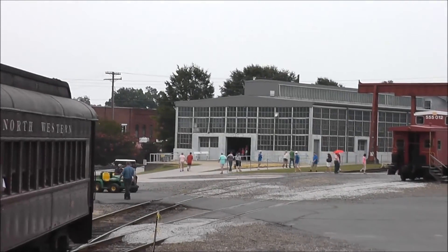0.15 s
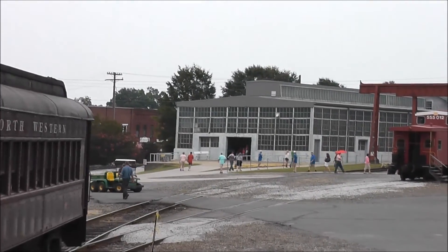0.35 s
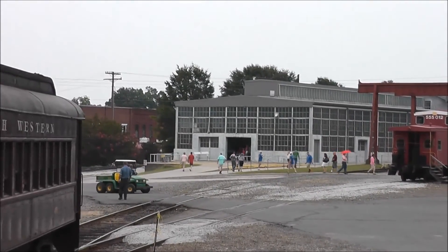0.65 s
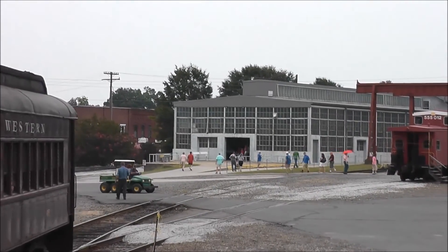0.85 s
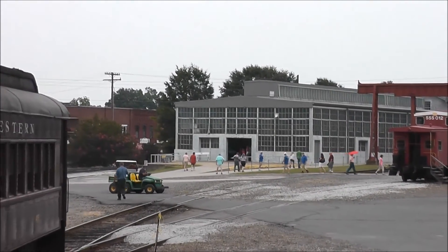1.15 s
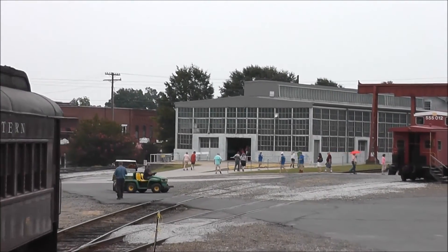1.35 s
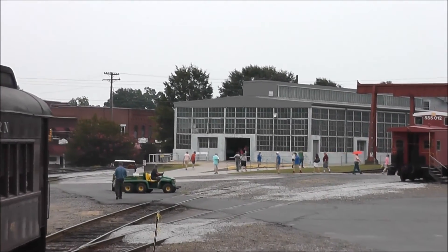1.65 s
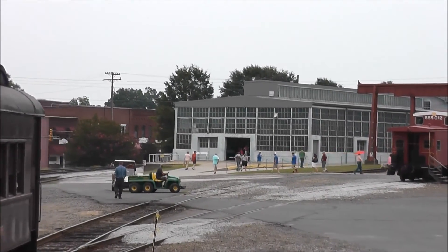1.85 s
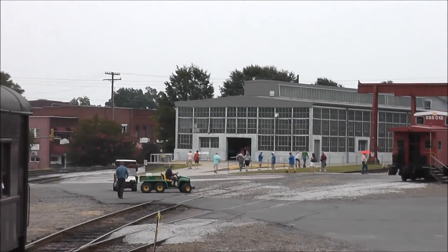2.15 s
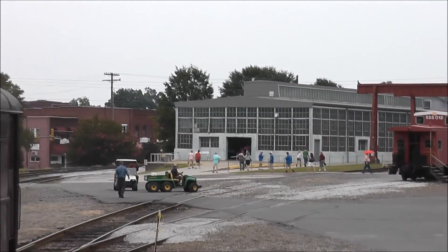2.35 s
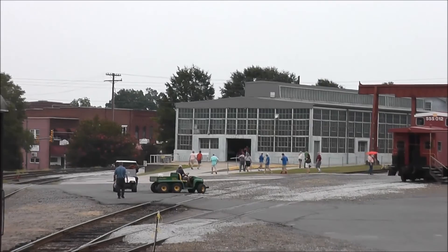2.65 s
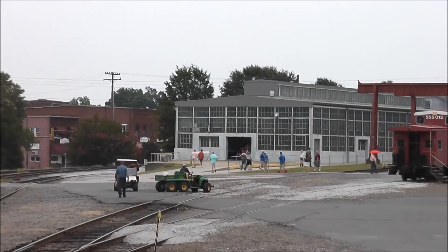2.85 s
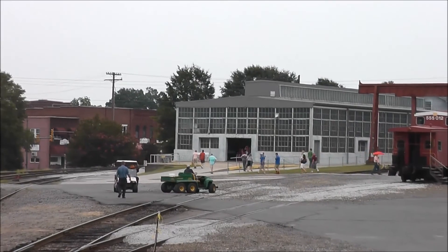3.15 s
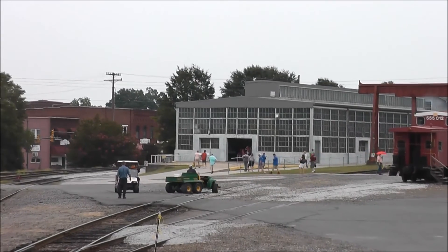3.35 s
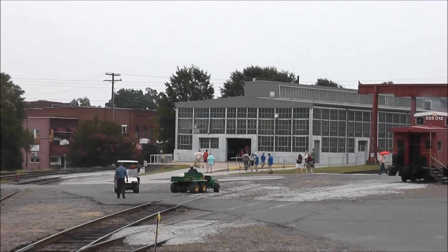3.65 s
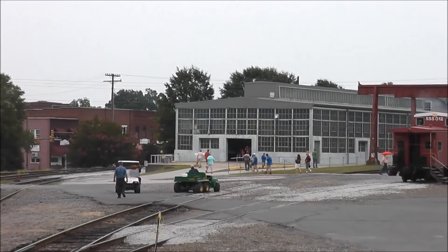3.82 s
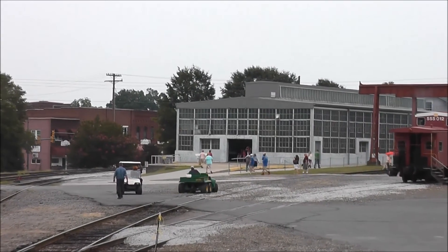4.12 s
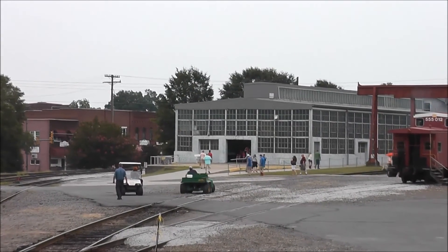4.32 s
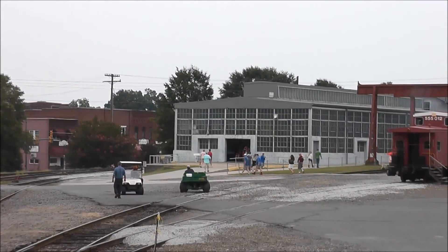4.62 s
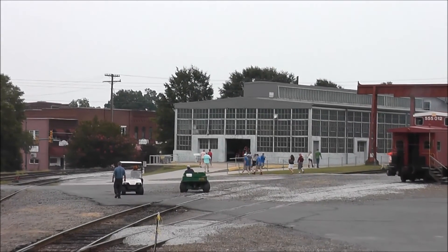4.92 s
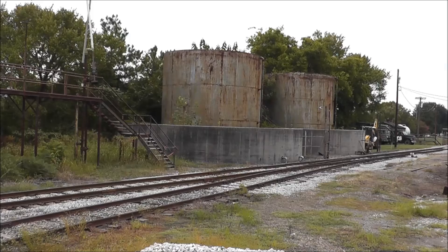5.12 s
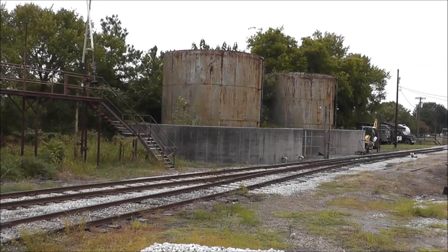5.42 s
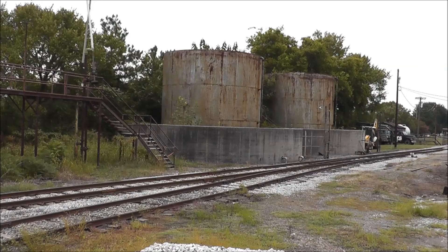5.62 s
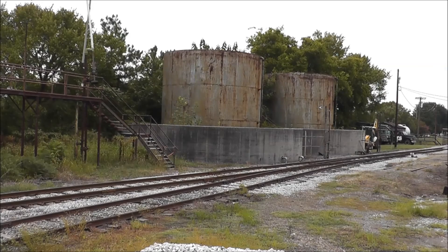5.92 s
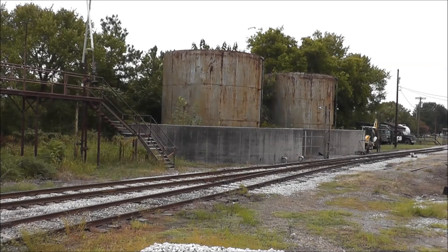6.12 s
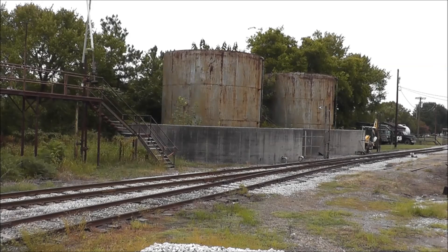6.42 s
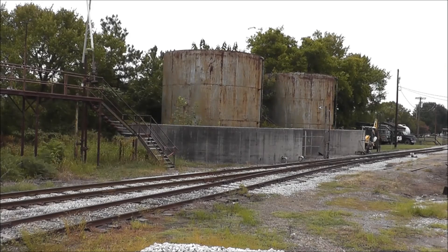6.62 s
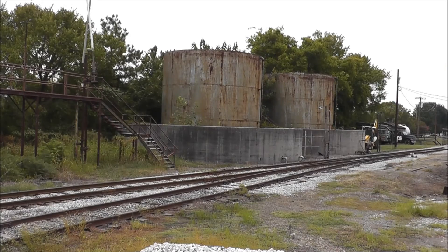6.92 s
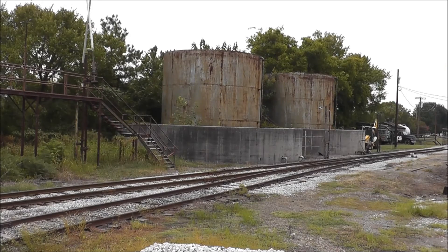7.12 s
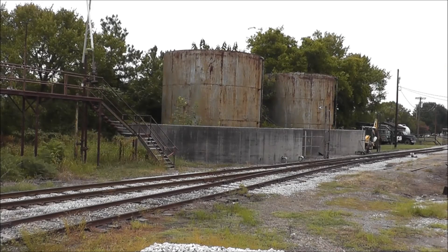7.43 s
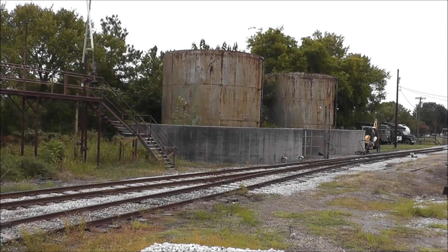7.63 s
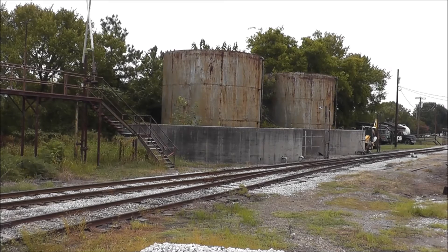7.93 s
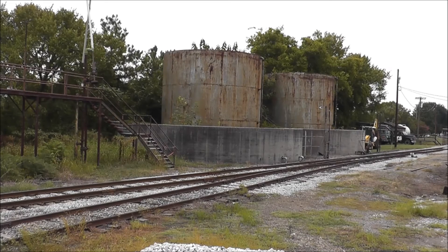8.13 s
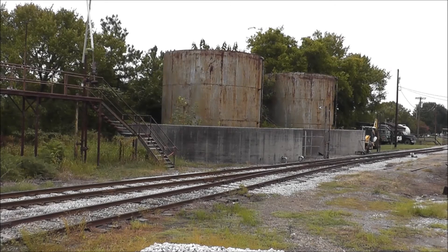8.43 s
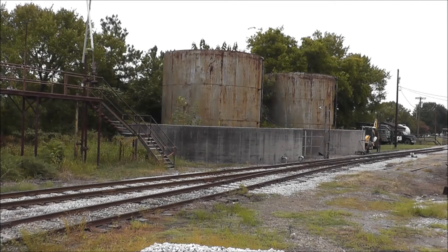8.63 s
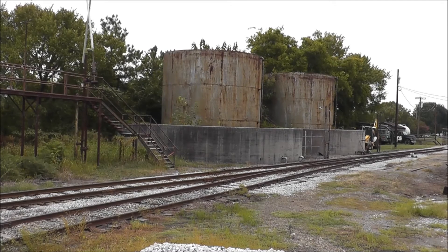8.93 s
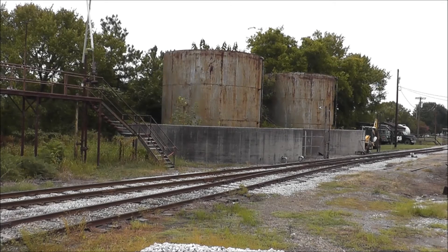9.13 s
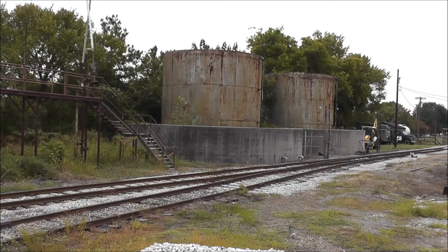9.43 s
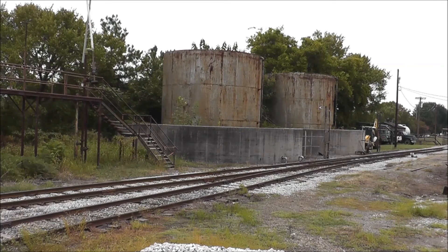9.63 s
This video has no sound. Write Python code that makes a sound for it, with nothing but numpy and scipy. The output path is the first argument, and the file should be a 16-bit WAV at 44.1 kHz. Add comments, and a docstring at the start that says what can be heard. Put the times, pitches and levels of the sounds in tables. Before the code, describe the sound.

A railway coach rolls slowly past, rumbling, clanking and squealing, then after a sudden silence a distant steam locomotive rumbles nearer.

```python
"""In a rail yard, the last coach of a slow steam train passes close by. Its body rumbles and thumps, and
its steel wheels grind on the rails, clank over the joints and squeal on the curve. The sound stops dead.
After a short silence a second scene fades in: the locomotive rumbles nearer from far off, with a low
drone, dull rail clatter, thinly singing wheels and very faint insects."""
import sys
import numpy as np
from scipy import signal
from scipy.fft import rfft, irfft, next_fast_len
from scipy.io import wavfile
from scipy.ndimage import uniform_filter1d

SR = 44100
rng = np.random.default_rng(int(sys.argv[2]) if len(sys.argv) > 2 else 0)


def pcm_store(signal):
    """Save signal as 16-bit PCM."""
    levels = np.round(np.clip(np.atleast_2d(signal), -1, 1) * 32767)
    wavfile.write(sys.argv[1], SR, levels.astype(np.int16).T)


N = 430857
T = np.arange(N) / SR
HZ = np.maximum(np.fft.rfftfreq(N, 1 / SR), 1)
RECEDE_S, CUT_S, RESUME_S = 2.66, 4.587, 5.07  # coach draws away, first scene ends, second begins
LEAD_S = .03  # a clank starts with a scrape, this long before its blow

# The notes a coach wheel rings at as it bends. Each row: pitch in Hz, relative level in dB.
WHEEL_MODES = [(1560, -1), (1980, -2.5), (2650, -5), (3050, 4), (3560, -3), (4050, 1), (4400, 2.5),
               (4820, -3), (5270, -4.5), (5620, 2), (6050, -5), (6450, 4.5), (7100, -15.5), (7600, 4.5),
               (7950, -1.5), (8400, -8.5), (9350, -18.5)]
# How hard the wheels grind on the curve. Each row: time in seconds, relative level in dB.
GRIND_LEVELS = [(0.0, -26.5), (0.16, -29.5), (0.3, -26), (0.5, -31.5), (0.75, -27), (0.82, -32),
                (0.95, -29), (1.17, -28.5), (1.4, -26.5), (1.82, -26.5), (2.01, -26.5), (2.54, -31),
                (2.91, -27), (3.05, -33.5), (3.49, -32.5), (4.11, -35), (4.26, -38), (4.38, -40.5)]
# The tone of steel struck nearby. Each row: frequency in Hz, relative level in dB.
CLANK_COLOUR = [(150, -11.5), (450, 13), (1000, 6), (2200, 3), (4300, 0.5), (5500, -6), (8000, -14.5),
                (10500, -32), (15000, -46)]


def undb(db):
    """Turn decibels into a gain to multiply by."""
    return 10 ** (np.asarray(db) / 20)


def unit(x):
    """Scale to an average power of 1."""
    return x / np.sqrt(np.mean(x ** 2))


def curves(table):
    """Join a table's values with straight lines; its first column is the time."""
    times, *columns = np.transpose(table)
    return [np.interp(T, times, column) for column in columns]


def arch(middle_s, length_s):
    """A rounded rise from 0 to 1 and back."""
    return np.maximum(1 - (2 * (T - middle_s) / length_s) ** 2, 0)


def walk(rate, count=N):
    """Wander smoothly around zero, taking about `rate` random steps a second."""
    step = max(int(SR / rate), 2)
    held = np.repeat(rng.standard_normal(count // step + 2), step)
    return 1.18 * uniform_filter1d(held, step)[:count]


def shape(points, hz=HZ):
    """Gain at each frequency, drawn through (Hz, dB) points."""
    points_hz, db = np.transpose(points)
    return undb(np.interp(np.log(hz), np.log(points_hz), db))


def humps(modes):
    """Gain that lifts or lowers a band around each resonance."""
    return undb(sum(db / (1 + (2 * (HZ - hz) / width_hz) ** 2) for hz, width_hz, db in modes))


def crowded_modes(hz, depth_db, count=500):
    """Heavy steel has too many resonances to list, so use narrow random peaks and dips."""
    return undb(depth_db * np.interp(hz, np.linspace(0, SR / 2, count), rng.standard_normal(count)))


def below(edge_hz, order=8):
    """Gain that keeps the low frequencies."""
    return 1 / np.sqrt(1 + (HZ / edge_hz) ** order)


def above(edge_hz):
    """Gain that keeps the high frequencies."""
    return np.sqrt(1 - below(edge_hz) ** 2)


def filtered(x, gain):
    """Give each frequency its own gain."""
    size = next_fast_len(N, True)
    gain = np.interp(np.fft.rfftfreq(size, 1 / SR), HZ, gain)
    return irfft(rfft(x, size) * gain, size)[..., :N]


def add(track, s, sound):
    """Mix a sound in at s seconds, dropping whatever falls outside the track."""
    start = min(int(s * SR), N - 1)
    part = sound[..., max(-start, 0):N - start]
    start = max(start, 0)
    track[:, start:start + part.shape[-1]] += part


def place(sound, lean, width):
    """Make stereo: direct sound leans to one side, and sound scattered by the yard adds width."""
    direct, scattered = sound
    pan = (shape(lean) - 1) / (shape(lean) + 1)
    diffuse = np.sqrt(np.maximum(shape(width) ** 2 - pan ** 2, .001))
    side = filtered(direct, pan) + filtered(scattered, diffuse)
    return np.array([direct + side, direct - side])


def rough_noise(gain, rate, rough_db):
    """Noise in uneven bursts, as when rough surfaces roll. Two rows: direct and scattered sound."""
    bursts = rng.standard_normal((2, N)) * undb(rough_db * walk(rate))
    return unit(filtered(bursts, gain))


def sing(hz, length_s, jitter, flutter_db=4.5, glide=0, count=22050):
    """Rubbing feeds one note, which swells, flutters and dies within `count` samples."""
    size = int(np.clip(length_s * SR, 200, count))
    bend = 1 + glide * np.linspace(-.5, .5, size) + jitter * walk(350, count)[:size]
    phase = 2 * np.pi * np.cumsum(hz * bend) / SR
    swell = np.sqrt(np.hanning(size)) * undb(flutter_db * walk(80, count)[:size])
    return swell * np.array([np.sin(phase), np.cos(phase)])


def clank(colour, treble_db, length_s, tail_db, tail_t60,
          bite_hz=2000, bite_db=0, scrape_db=-15, chatter_db=1.5, count=16384):
    """A scrape, a chattering blow, then ringing that falls 60 dB in tail_t60 seconds."""
    t = np.arange(count) / SR - LEAD_S
    hz = np.maximum(np.fft.rfftfreq(count, 1 / SR), 1)
    blow = np.exp(-(t / max(length_s, .002)) ** 2) * undb(chatter_db * walk(602, count))
    ring = undb(tail_db - 60 * np.abs(t) / tail_t60 + chatter_db * walk(120, count))
    scrape = undb(scrape_db) * np.exp(-np.abs(t) / .008)
    attack = np.clip(t / max(length_s / 4, .0015), 0, 1)
    force = (attack * (blow + ring) + scrape) * rng.standard_normal((2, count))
    bite = bite_db / (1 + ((hz - bite_hz) / 400) ** 2)  # one resonance stands out
    gain = shape(colour, hz) * undb(treble_db * hz / (hz + 3000) + bite)
    gain *= crowded_modes(hz, depth_db=4.5, count=300)
    return irfft(rfft(force) * unit(gain))


def insects(chirp_hz=6840, chirps_per_s=3.2, swell_s=0.76):
    """An insect throbs over a thin chorus and the faint hiss of open air."""
    throb = np.cos(np.pi * chirps_per_s * (T - 5.7)) ** 2
    chirp = throb * rough_noise(np.exp(-((HZ - chirp_hz) / 90) ** 2), rate=60, rough_db=0)
    chorus = rough_noise(np.exp(-((HZ - 7600) / 500) ** 2), rate=7, rough_db=2.5)
    air = rough_noise(below(12000, order=2), rate=60, rough_db=0)
    fade_in = np.clip((T - RESUME_S) / swell_s, 0, 1)
    return (undb(-75) * chirp + undb(-76) * chorus + undb(-74) * air) * fade_in


def far_scrapes(width_hz=110):
    """Far off, the wheels' guiding rims (flanges) rub the rail with a soft metallic scrape."""
    # Each row: middle in seconds, length in seconds, level in dB.
    scrapes = [(6.78, 0.27, -57), (7.27, 0.2, -52.5), (7.46, 0.36, -53), (8.148, 0.6, -57.5)]
    wheel = sum(undb(db) / (1 + (2 * (HZ - hz) / width_hz) ** 2) for hz, db in WHEEL_MODES)
    swell = sum(undb(db) * arch(s, length_s) for s, length_s, db in scrapes)
    return swell * rough_noise(wheel * above(4700) * below(7000), rate=29, rough_db=3.0)


def far_joints(gain_db=-12.0):
    """The distant engine's wheels strike rail joints with dull clanks."""
    # Each row: time in seconds, relative level in dB, treble boost in dB.
    strikes = [(5.888, -41, -36), (6.185, -39, 4), (6.39, -27, -26), (6.662, -26.5, 5), (6.716, -28.5, 16),
               (7.057, -21, 0), (7.096, -29, 26), (7.107, -19, 8), (7.124, -23, 10), (7.153, -28, 8),
               (7.243, -21.5, 13), (7.267, -22.5, 8), (7.288, -24.5, 9), (7.333, -22.5, 6), (7.368, -26, 3),
               (7.449, -19.5, -12), (7.473, -24, 10), (8.01, -26, 0), (8.326, -25.5, 3), (8.49, -22, -30),
               (8.879, -20.5, -5), (9.3, -25, 1)]
    # The tone of distant steel. Each row: frequency in Hz, relative level in dB.
    colour = [(150, -6), (450, 15), (1400, 18), (2400, 9), (4000, -6.5), (8000, -24), (15000, -76)]
    out = np.zeros((2, N))
    for s, db, treble_db in strikes:
        blow = clank(colour, treble_db, length_s=0.0058, tail_db=-3.0, tail_t60=0.35)
        add(out, s - LEAD_S, undb(db + gain_db) * blow)
    return out


def drone(gain_db=-0.5):
    """Low resonances of the locomotive swell out of its roar."""
    # Each row: middle and length in seconds, pitch in Hz, relative level in dB,
    # then wobble and rise as shares of the pitch.
    notes = [(8.85, 0.8, 256, -34, 0.085, 0), (8.5, 0.2, 440, -29.5, 0.13, 0),
             (8.84, 0.45, 400, -31, 0.0386, 0), (8.95, 0.9, 310, -34.5, 0.15, 0),
             (8.1, 0.38, 790, -41, 0.052, 0.0018), (9.33, 0.48, 435, -36, 0.12, 0.016),
             (9.38, 0.83, 740, -36.5, 0.119, 0.029)]
    out = np.zeros((2, N))
    for s, length_s, hz, db, jitter, glide in notes:
        tone = sing(hz, length_s, jitter, flutter_db=4.0, glide=glide, count=SR)
        add(out, s - length_s / 2, undb(db + gain_db) * tone)
    return out


def locomotive():
    """The engine's rumble, rolling roar and hiss of steam and rails grow as it comes nearer."""
    # Each row: time in seconds, then relative levels of rumble, roar and hiss in dB.
    approach = [(5.3, -52.5, -54.5, -66.5), (5.39, -48, -52, -64), (6.37, -38, -39.5, -51),
                (6.64, -33.5, -38, -48), (6.66, -32.5, -35, -45), (6.91, -30.5, -36, -46.5),
                (7.25, -30.5, -32.5, -40.5), (7.81, -29, -34, -43.5), (8.92, -29.5, -31.5, -42),
                (9.77, -29.5, -32.5, -41.5)]
    # Brief swells of the rumble. Each row: middle in seconds, length in seconds, rise in dB.
    heaves = [(7.56, 0.33, 2), (8.234, 0.28, 2.5), (8.66, 0.2, 2), (9.151, 0.14, 2.5)]
    # The engine's overall tone. Each row: frequency in Hz, relative level in dB.
    colour = [(15, -46), (25, -16), (69, 0.5), (129, 3.5), (221, -7), (253, -2.5), (289, -10.5), (433, -7),
              (631, -12.5), (761, -11), (970, -17.5), (1410, -12.5), (4620, -36.5), (7700, -39),
              (10500, -48), (15500, -54)]
    # Each row: frequency in Hz, width in Hz, boost in dB.
    resonances = [(173, 30, 4), (443, 56, 3), (855, 75, 2.5), (1140, 480, 4.5), (1740, 410, 1.5),
                  (2150, 370, -2.5), (3680, 1800, 2.5), (5770, 200, 3.5), (7100, 220, 4), (8500, 200, 1)]
    rumble_db, roar_db, hiss_db = curves(approach)
    rumble_db += sum(db * arch(s, length_s) for s, length_s, db in heaves)
    body = shape(colour) * humps(resonances)
    rumble = undb(rumble_db + 0.4) * rough_noise(body * below(410), rate=30, rough_db=0.9)
    roar = undb(roar_db - 0.63) * rough_noise(body * above(342) * below(1330), rate=60, rough_db=0.8)
    hiss = undb(hiss_db + 0.53) * rough_noise(body * above(1720), rate=77, rough_db=0.57)
    return rumble + roar + hiss


def fine_hiss():
    """A thin hiss trails the last coach, rising quickly and dying away slowly."""
    # Each row: start in seconds, rise time in seconds, top level in dB, fall in dB per second.
    hisses = [(2.42, 0.047, -39, 20.5), (3.1, 0.21, -44.5, 8)]
    # The tone of the hiss. Each row: frequency in Hz, relative level in dB.
    colour = [(6000, 9), (9200, -2), (11000, -10.5), (13200, -19), (15500, -33.5)]
    swell = np.zeros(N)
    for s, rise_s, db, fall in hisses:
        swell += np.clip((T - s) / rise_s, 0, 1) * undb(db - fall * np.maximum(T - s - rise_s, 0))
    return swell * rough_noise(shape(colour) * above(7800), rate=49, rough_db=2.3)


def grit(per_s=45, gain_db=-5):
    """Sand and rust crack under the wheels in small ticks, louder with the grinding."""
    out, grind_db = np.zeros((2, N)), curves(GRIND_LEVELS)[0]
    for when, softness, dullness in rng.random((int(per_s * CUT_S), 3)):
        s = when * CUT_S
        db = grind_db[int(s * SR)] + gain_db - 3.0 * np.log(.1 + .9 * softness)
        tick = clank(CLANK_COLOUR, -8 * dullness, 0.0055, tail_db=-10.5, tail_t60=.06, count=4096)
        add(out, s - LEAD_S, undb(db) * tick)
    return out


def rattle(per_s=55, gain_db=-7, spread_db=3, low_hz=1300, high_hz=3400):
    """Loose brake rods shake in bouts of quick, uneven ticks, each with its own pitch."""
    # Each row: middle in seconds, length in seconds, relative level in dB.
    bouts = [(2.819, 0.13, -18), (3.008, 0.095, -20.5), (3.309, 0.32, -24), (3.541, 0.14, -20.5),
             (4.017, 0.43, -27.5)]
    out = np.zeros((2, N))
    for middle_s, length_s, db in bouts:
        ticks = int(per_s * length_s)
        for k, (late, size, pitch) in enumerate(rng.random((ticks, 3))):
            s = middle_s + length_s * ((k + late) / ticks - .5)
            tick = clank(CLANK_COLOUR, -11.0, length_s=0.003, tail_db=-9.5, tail_t60=0.095,
                         bite_hz=low_hz * (high_hz / low_hz) ** pitch, bite_db=9.0, count=4096)
            add(out, s - LEAD_S, undb(db + gain_db + spread_db * (2 * size - 1)) * tick)
    return out


def squeaks(per_s=110, gain_db=-20, detune=0.11, fall_db_per_s=3):
    """Wheels keep catching on the rail: faint, overlapping squeaks, louder with the grinding."""
    out, grind_db = np.zeros((2, N)), curves(GRIND_LEVELS)[0]
    for when, pick, softness, stretch, offset in rng.random((int(per_s * CUT_S), 5)):
        s = when * CUT_S
        hz, db = WHEEL_MODES[int(pick * len(WHEEL_MODES))]
        db -= 4 * abs(np.log2(hz / 4000))  # 4 dB weaker per octave away from 4000 Hz
        db -= fall_db_per_s * max(s - RECEDE_S, 0)
        db += gain_db + grind_db[int(s * SR)] - 1.5 * np.log(.1 + .9 * softness)
        tone = sing(hz * (1 + detune * (offset - .5)), 0.05 + 0.2 * stretch, jitter=0.0085, count=8192)
        add(out, s, undb(db) * tone)
    return out


def singing_wheels(gain_db=-4):
    """Now and then a rubbed wheel sings one clear note, in both scenes."""
    # Each row: middle in seconds, length in seconds, pitch in Hz, relative level in dB.
    notes = [(0.17, 0.23, 5150, -32), (0.813, 0.18, 7500, -39), (0.846, 0.1, 4820, -31),
             (1.28, 0.077, 1525, -24.5), (1.693, 0.18, 5660, -35), (2.005, 0.13, 5680, -26.5),
             (2.47, .05, 7450, -35), (2.459, 0.05, 4360, -29), (3.08, 0.089, 5540, -39),
             (3.658, 0.098, 5600, -34), (6.719, 0.014, 2260, -30.5), (6.76, 0.12, 6540, -56),
             (6.85, 0.09, 4900, -54), (7.106, 0.04, 4600, -47), (7.35, 0.3, 5830, -54)]
    out = np.zeros((2, N))
    for s, length_s, hz, db in notes:
        tone = sing(hz, length_s, jitter=.005, flutter_db=3.5)
        add(out, s - length_s / 2, undb(db + gain_db) * tone)
    return out


def squeal(jitter=.008, flutter_db=2.5, edge_s=0.057):
    """A wheel's rim sticks and slips against the rail, making a wavering tone with overtones."""
    # Each row: time in seconds, pitch in Hz, level of the lowest tone in dB, of the next one in dB.
    course = [(1.9, 1186, -34.5, -32.5), (1.94, 1171, -27.5, -27), (1.99, 1165, -23, -29.5),
              (2.05, 1180, -35, -37), (2.1, 1178, -31, -27.5), (2.145, 1183, -22.5, -24),
              (2.235, 1195, -23, -37.5), (2.28, 1209, -29.5, -34), (2.35, 1218, -30.5, -45),
              (2.4, 1230, -36, -52)]
    # Each row: multiple of the pitch, relative level in dB.
    overtones = [(2, 12.5), (3, 0), (4, -0.5), (5, -16.5), (6, -12), (7, -12.5)]
    hz, lowest_db, upper_db = curves(course)
    phase = 2 * np.pi * np.cumsum(hz * (1 + jitter * walk(400))) / SR
    tone = undb(lowest_db + flutter_db * walk(90)) * np.exp(1j * phase)
    for multiple, db in overtones:
        level_db = upper_db + db - overtones[0][1] + flutter_db * walk(90)
        tone += undb(level_db) * np.exp(1j * multiple * phase)
    grip = np.clip(1 + np.minimum(T - course[0][0], course[-1][0] - T) / edge_s, 0, 1)
    return np.array([tone.real, tone.imag]) * grip


def coach_levels(leave_s=4.085, drop_length_s=0.24):
    """Rumble and roar in dB: they surge on rough track and sink as the coach draws away."""
    # Each row: middle in seconds, length in seconds, rumble rise in dB, roar rise in dB.
    surges = [(0.26, 0.43, 6.5, 4.5), (0.624, 0.23, 5, 5.5), (1.082, 0.49, 5.5, 5), (1.41, 0.39, 4.5, 6.5),
              (1.858, 0.21, 7.5, 6.5), (2.557, 0.29, 6.5, 1), (2.748, 0.15, 4, 4.5),
              (2.964, 0.46, 4.5, 3.5), (3.36, 0.42, 3.5, 1), (3.547, 0.26, 1, 5.5), (3.746, 0.39, 6, 1)]
    gone_s = np.maximum(T - RECEDE_S, 0)
    drop_db = 6 * np.clip((T - leave_s) / drop_length_s, 0, 1)  # the last wheels leave the crossing
    rumble_db = -23.5 - 1.74 * gone_s - drop_db
    roar_db = -27 - 2.5 * gone_s - drop_db
    for s, length_s, rumble_rise_db, roar_rise_db in surges:
        rumble_db += rumble_rise_db * arch(s, length_s)
        roar_db += roar_rise_db * arch(s, length_s)
    return rumble_db, roar_db


def coach(deepen_s=3.1, deep_hz=135):
    """The coach's body rumbles while its wheels roar on the rails and grind on the curve."""
    # The coach's overall tone. Each row: frequency in Hz, relative level in dB.
    colour = [(15, -63), (25, -25.5), (198, 0), (340, -5.5), (433, -7), (1050, -16.5), (1200, -17.5),
              (1300, -19.5), (2010, -17), (2170, -20.5), (2420, -18), (4490, -22), (7700, -32),
              (13200, -56), (15500, -75)]
    # The wheels and their frames. Each row: frequency in Hz, width in Hz, boost in dB.
    resonances = [(187, 41, 1.5), (446, 63, 4), (706, 150, 2), (1910, 350, 0.5), (4030, 900, 0.5),
                  (5400, 180, 3), (8000, 800, 0.5)]
    rumble_db, roar_db = coach_levels()
    grind_db = curves(GRIND_LEVELS)[0] - 1.5
    body = shape(colour) * humps(resonances)
    away = np.clip((T - deepen_s) / 0.69, 0, 1)  # the rumble deepens as the coach draws away
    near = rough_noise(body * below(330), rate=45, rough_db=2.5)
    deep = rough_noise(body * below(340) * humps([(deep_hz, 70, 6)]), rate=50, rough_db=2.0)
    rumble = undb(rumble_db) * (np.sqrt(1 - away) * near + np.sqrt(away) * deep)
    roar = undb(roar_db) * rough_noise(body * above(330) * below(1500), rate=70, rough_db=0.96)
    steel = body * above(1100) * crowded_modes(HZ, depth_db=2.0)
    grind = undb(grind_db) * rough_noise(steel, rate=140, rough_db=1.0)
    return rumble + roar + grind


def wheel_ring(main_hz, t60=.32, others_db=-14, rise_s=0.002, count=8192):
    """A struck wheel rings with one main note and fainter others; the rubbing rail roughens them."""
    t = np.arange(count) / SR
    hz, db = np.transpose(WHEEL_MODES)
    luck, detune = rng.standard_normal((2, len(hz)))
    db = db + others_db + 3 * luck - 5 * np.maximum(np.log2(hz / 4000), 0)
    wobbly_time = np.cumsum(1 + .009 * walk(500, count)) / SR
    others = undb(db) @ np.exp(2j * np.pi * np.outer(hz * (1 + 0.024 * detune), wobbly_time))
    main = np.exp(2j * np.pi * main_hz * wobbly_time) * undb(3 * walk(120, count))
    ring = (main + others) * undb(-60 * t / t60) * np.minimum(t / rise_s, 1)
    return np.array([ring.imag, ring.real])


def near_joints(gain_db=-9.5):
    """The coach's wheels strike rail joints and its couplings snatch: sharp, ringing clanks."""
    # Each row: time in seconds, relative level in dB, treble boost in dB, length of the blow in
    # seconds, ring pitch in Hz, ring level in dB.
    strikes = [(0.015, -5, -1, 0.012, 1990, -31.5), (0.355, -6, -11.5, 0.015, 3040, -29),
               (0.415, -19, 5, 0.009, 4430, -33.5), (0.57, -16, 3, 0.022, 4500, -44.5),
               (0.6097, -8, 16.5, 0.02, 4160, -30), (0.699, -4.5, 4, 0.009, 4000, -30.5),
               (0.878, -12.5, 2, 0.012, 4860, -39), (1.323, -16.5, 9, 0.014, 4400, -36),
               (1.551, -11, 9, 0.0086, 4300, -28.5), (1.583, -11, 0, 0.01, 4270, -32.5),
               (1.921, -8.5, 15, 0.02, 2420, -31.5), (2.044, -11, 9.5, 0.012, 2400, -31),
               (2.244, -5, 10, 0.0075, 2380, -34), (2.393, -14.5, -20.5, 0.017, 3560, -39.5),
               (2.4416, -14.5, -2.5, 0.012, 5240, -28), (2.593, -10, -42.5, 0.011, 2000, -46.5),
               (2.75, -13.5, -2, 0.028, 2190, -36), (2.878, -18, 0, 0.01, 3050, -46),
               (2.942, -10, -32, 0.0065, 2650, -43.5), (2.992, -28, -19, 0.014, 1210, -32),
               (3.111, -13.5, -34, 0.01, 1200, -43), (3.224, -19.5, -16, 0.012, 1980, -36.5),
               (3.485, -17.5, -16.5, 0.022, 3050, -41), (3.597, -26.5, -6, 0.014, 1560, -46),
               (3.828, -13.5, -27, 0.006, 3050, -50), (4.218, -17.5, -9, 0.017, 4070, -36)]
    out = np.zeros((2, N))
    for s, db, treble_db, length_s, ring_hz, ring_db in strikes:
        bite_db = max(17 + .6 * (ring_db - db), 0)  # a strong ring also colours the blow itself
        blow = clank(CLANK_COLOUR, treble_db, length_s, tail_db=-7.0, tail_t60=0.31,
                     bite_hz=ring_hz, bite_db=bite_db)
        add(out, s - LEAD_S, undb(db + gain_db) * blow)
        add(out, s, undb(ring_db) * wheel_ring(ring_hz))
    return out


def axle_blows(gap_s=.338, gap_growth=.0048):
    """Three axles drop into the same joint in turn; the gap grows as the train slows."""
    # Each row: time of the first axle in seconds, pitch in Hz, each axle's relative level in dB.
    crossings = [(0.019, 440, -7, -8.5, -22), (0.303, 211, -4.5, -7, -11), (1.139, 436, -4.5, -2.5, -20.5),
                 (2.184, 203, -6.5, -8.5, -4), (2.243, 287, -7, -4, -4.5), (3.838, 288, -10.5, -11, -15.5)]
    blows = []
    for s, hz, *axles_db in crossings:
        for db in axles_db:
            blows.append((s, db, hz))
            s += gap_s + gap_growth * s
    return blows


def thumps(gain_db=-3.5, scatter_db=-14, octave_db=-13, knock_db=-17):
    """A heavy push swings a vehicle's body for a few cycles, and its planks give a dull knock."""
    # Single dull thumps of the coach and the distant engine.
    # Each row: time in seconds, relative level in dB, pitch in Hz.
    single_thumps = [(0.212, -8, 251), (0.697, -12.5, 477), (1.329, -8, 199), (1.397, -8, 204),
                     (1.523, -9.5, 480), (1.833, -4.5, 296), (2.483, -1, 174), (2.627, -6, 205),
                     (3.055, -1.5, 168), (3.667, -14, 158), (4.145, -12.5, 245), (4.394, -17, 170),
                     (4.455, -16, 200), (5.888, -25.5, 148), (6.383, -23, 130), (6.664, -17, 145),
                     (7.365, -20.5, 460), (7.446, -11, 137), (7.535, -19, 139), (8.646, -14, 99),
                     (9.127, -17, 125)]
    # The tone of the planks. Each row: frequency in Hz, relative level in dB.
    planks = [(120, -29.5), (350, -1), (600, -0.5), (900, -14), (1500, -27.5), (4000, -32.5), (12000, -67)]
    out, t = np.zeros((2, N)), np.arange(SR // 12) / SR
    blows = axle_blows() + list(single_thumps)
    phases = 2 * np.pi * rng.random((len(blows), 2, 2, 1))
    for (s, db, hz), phase in zip(blows, phases):
        age = t / 0.0041 * np.sqrt(200 / hz)  # higher-pitched thumps swell and fade more slowly
        push = age ** 2 * np.exp(2 - 2 * age)
        angle = 2 * np.pi * hz * t
        swing = np.sin(angle + phase[0]) + undb(octave_db) * np.sin(2 * angle + phase[1])
        add(out, s + .003, undb(db + gain_db) * push * swing * undb([[0], [scatter_db]]))
        knock = clank(planks, 0, length_s=0.014, tail_db=-6, tail_t60=0.29, scrape_db=-18.0)
        hardness = min(hz / 220, 1.5)  # a harder blow sounds higher and knocks more
        add(out, s + .004 - LEAD_S, undb(db + knock_db) * hardness * knock)
    return out


def scene(fade_s=0.3):
    """The close pass stops dead; after a gap the distant approach fades in."""
    # The train lies to the left. Each row: frequency in Hz, left minus right in dB.
    coach_lean = [(60, -2.5), (110, -0.5), (200, -0.5), (380, 0.5), (700, 4.5), (1290, 8.5), (2380, 5.5),
                  (4400, 2), (8120, 1.5), (15000, 2)]
    engine_lean = [(60, -2.5), (110, -1), (200, 0.5), (380, 1), (700, 6), (1290, 11.5), (2380, 10.5),
                   (4400, 0.5), (8120, 0.0), (15000, 0.5)]
    # How wide it sounds. Each row: frequency in Hz, side minus middle in dB.
    coach_width = [(60, -8), (110, -13), (200, -14.5), (380, -11.5), (700, -4.5), (1290, -2), (2380, -5.5),
                   (4400, -12.5), (8120, -9), (15000, -3.5)]
    engine_width = [(60, -4), (110, -11.5), (200, -6.5), (380, -9.5), (700, -3.5), (1290, -2.5), (2380, -2),
                    (4400, -8.5), (8120, -9), (15000, -7)]
    running_gear = thumps() + near_joints() + far_joints() + singing_wheels()
    close = coach() + fine_hiss() + grit() + rattle() + squeal() + squeaks() + running_gear
    distant = locomotive() + far_scrapes() + drone() + insects() + running_gear
    stop = np.clip((CUT_S - T) / 0.0029, 0, 1)
    fade_in = (T > RESUME_S) * undb(-20 * np.clip(1 - (T - RESUME_S) / fade_s, 0, 1) ** 2.4)
    first = place(close, coach_lean, coach_width) * stop
    second = place(distant, engine_lean, engine_width) * fade_in
    return first + second


def record(dry, top_hz=15700):
    """Clip peaks at full scale, then remove the highest treble."""
    low_pass = signal.ellip(10, .1, 80, top_hz, fs=SR, output="sos")
    return signal.sosfilt(low_pass, np.clip(dry, -1, 1))


dry = scene()
out = record(dry)
pcm_store(out)
```